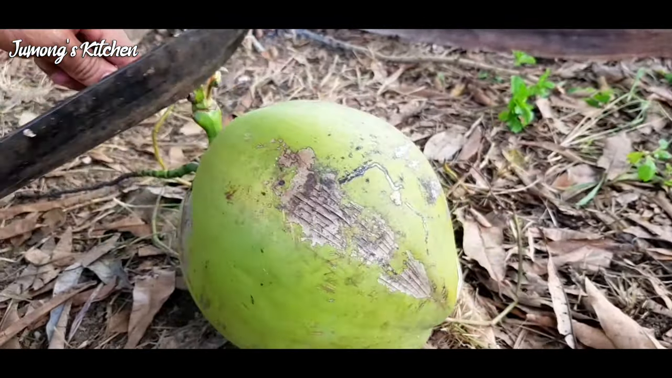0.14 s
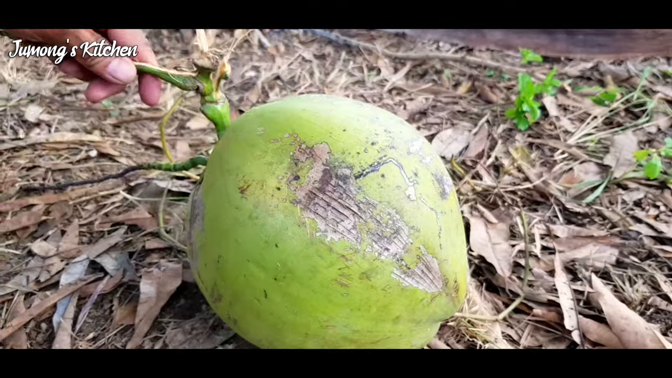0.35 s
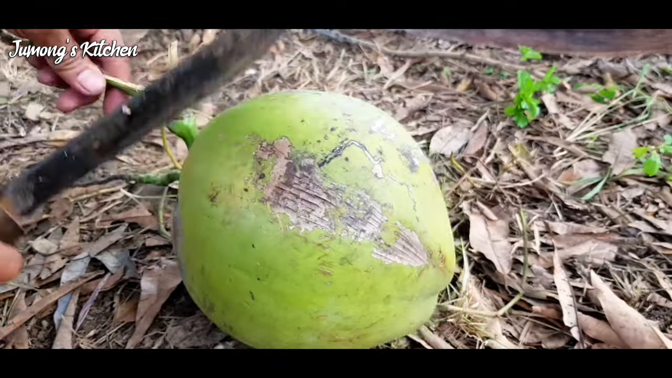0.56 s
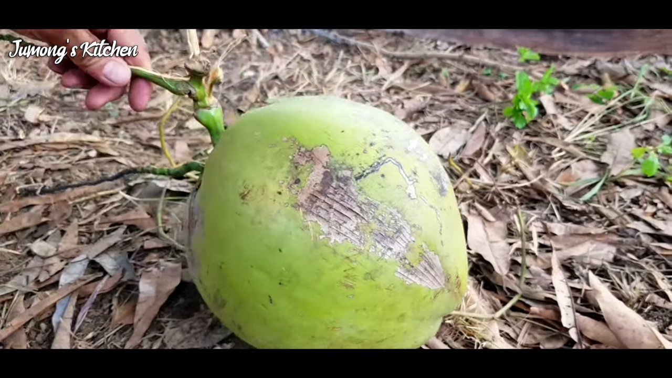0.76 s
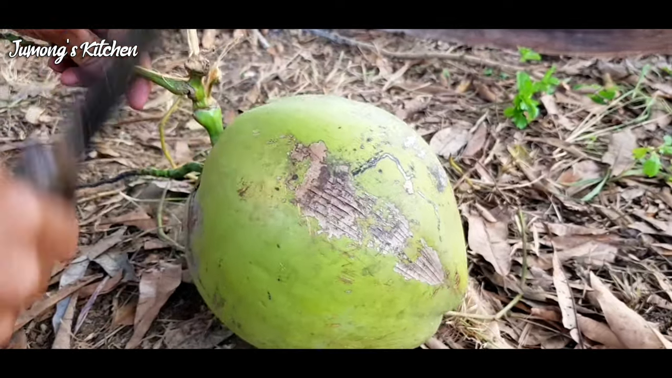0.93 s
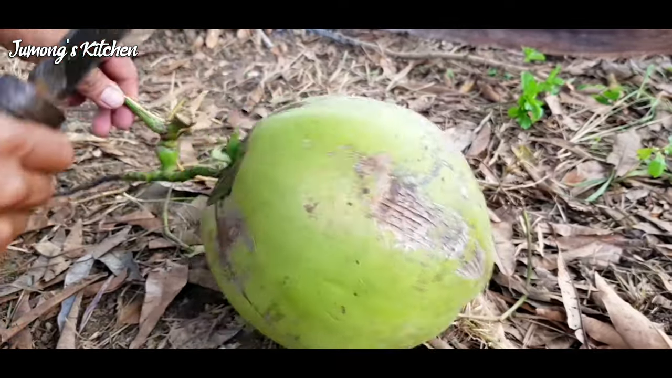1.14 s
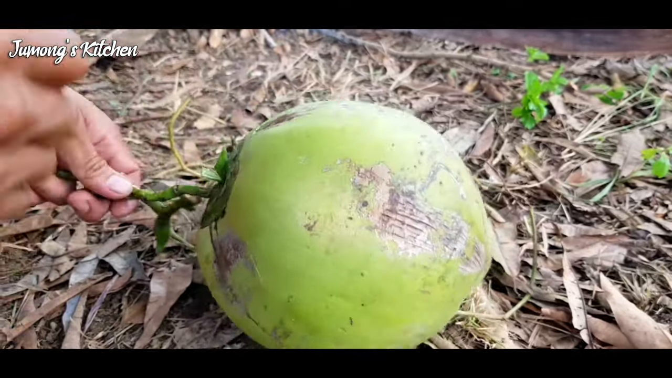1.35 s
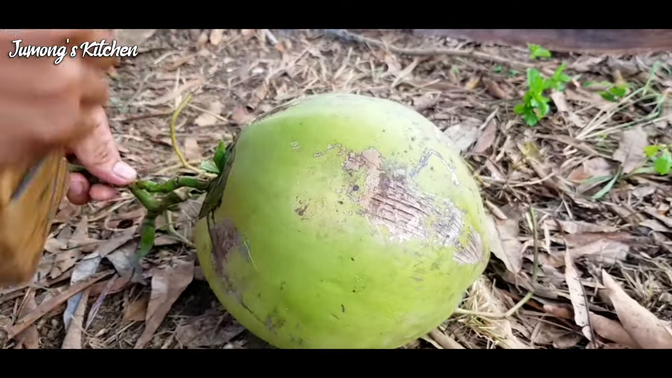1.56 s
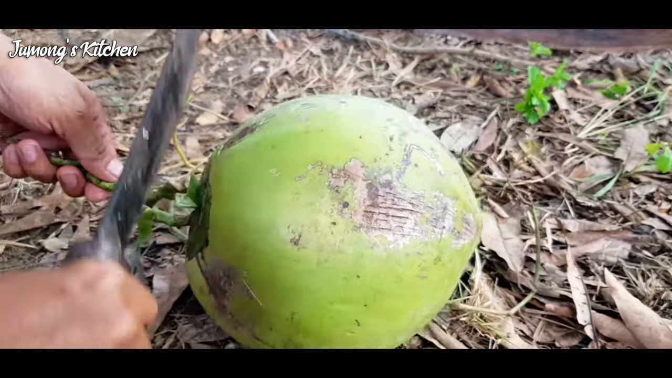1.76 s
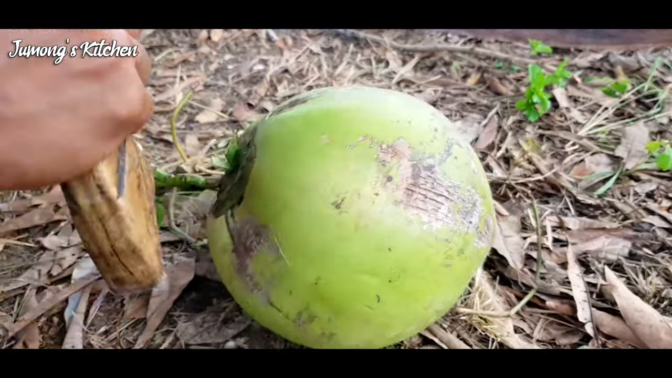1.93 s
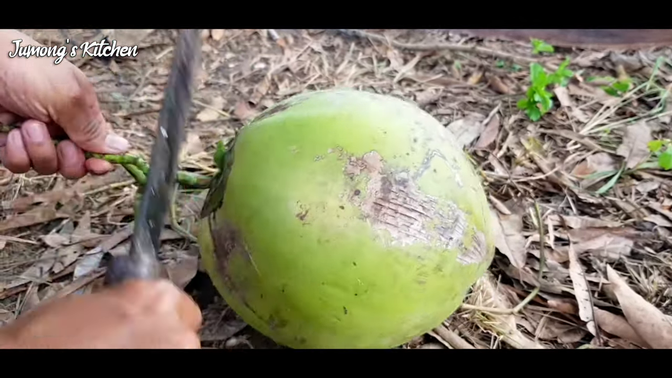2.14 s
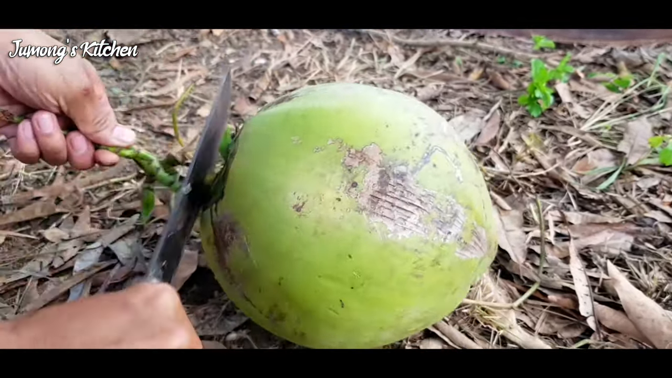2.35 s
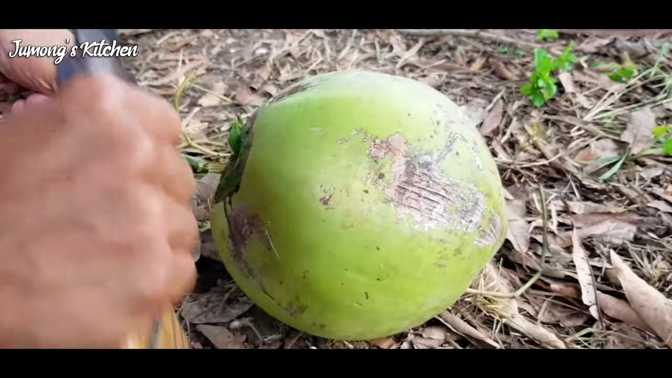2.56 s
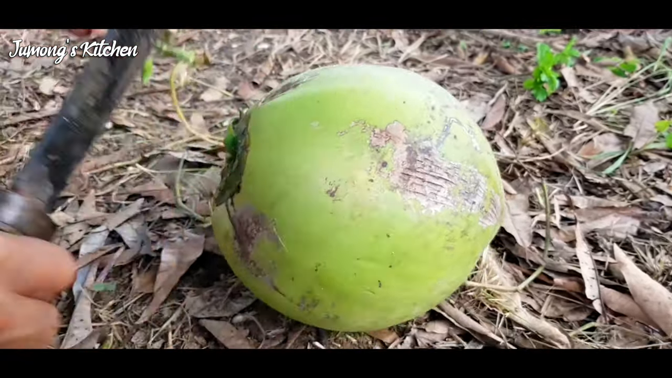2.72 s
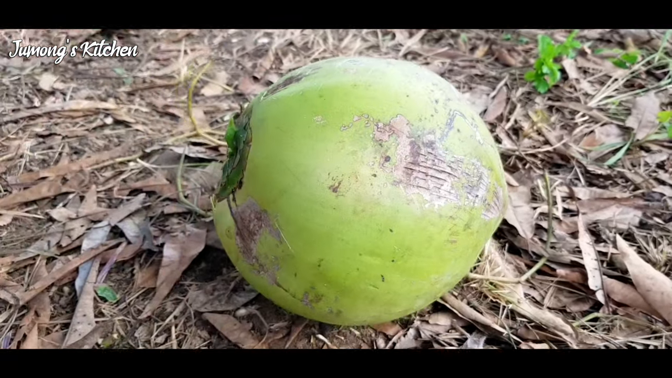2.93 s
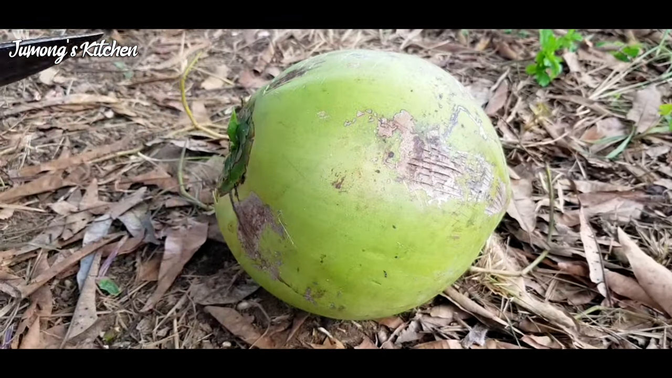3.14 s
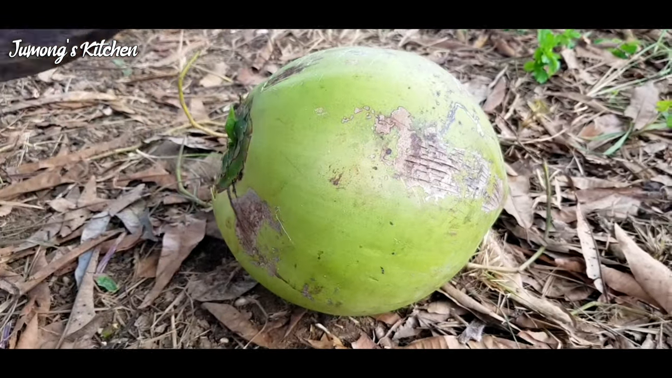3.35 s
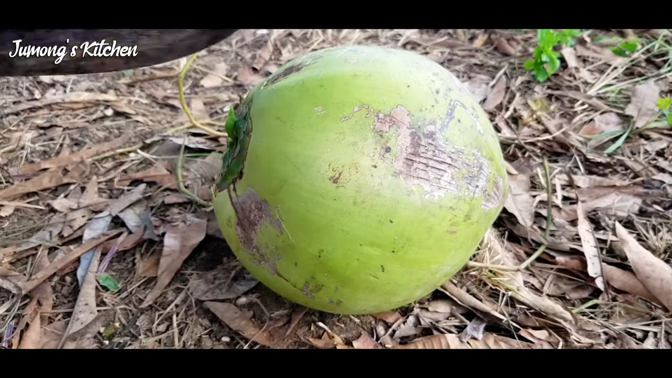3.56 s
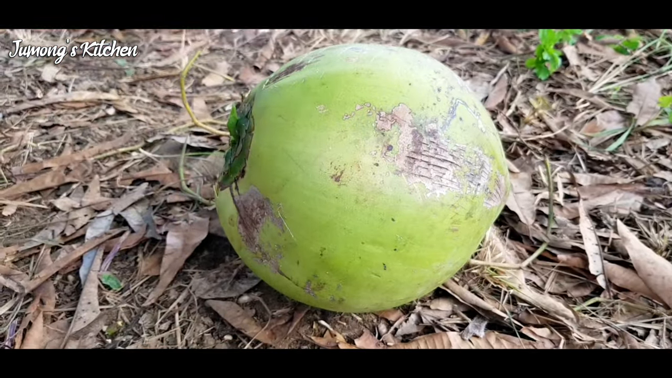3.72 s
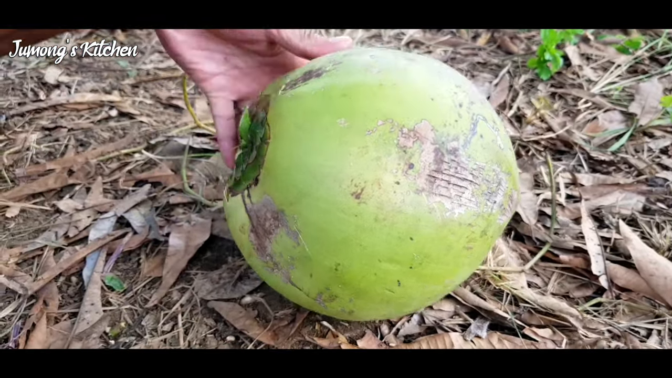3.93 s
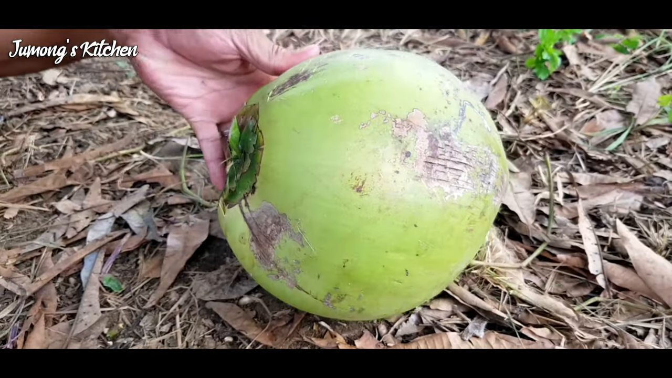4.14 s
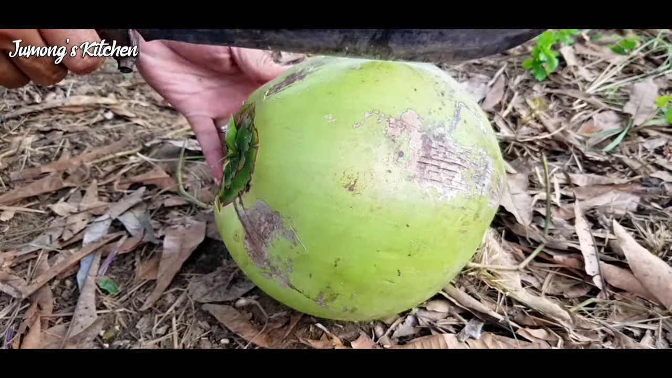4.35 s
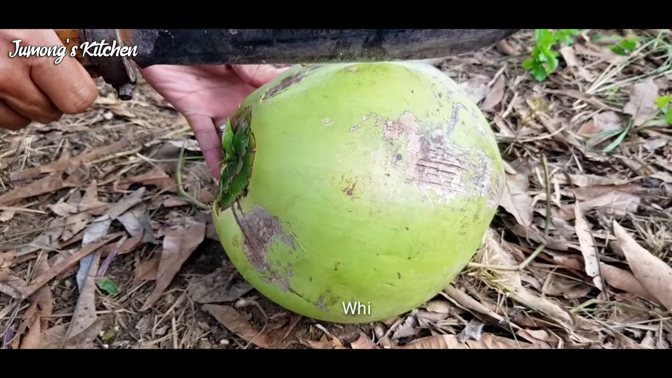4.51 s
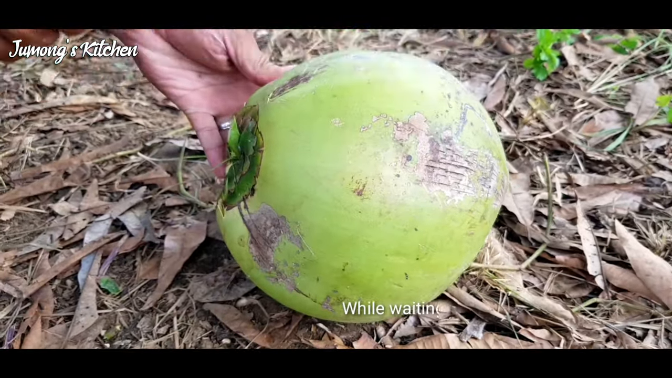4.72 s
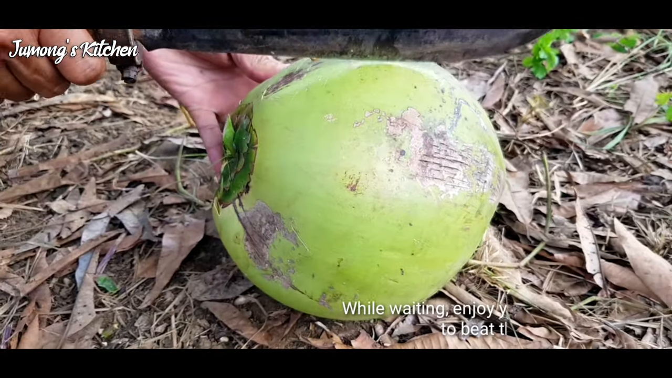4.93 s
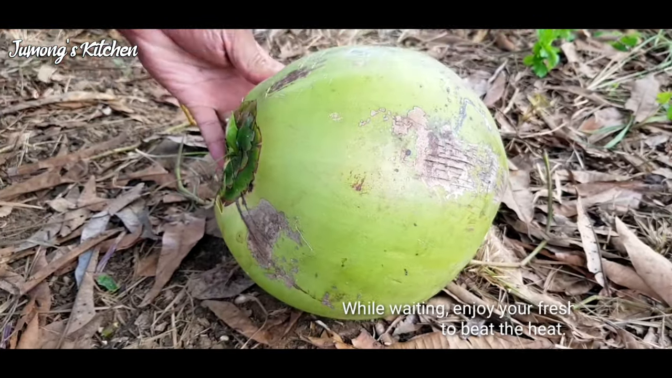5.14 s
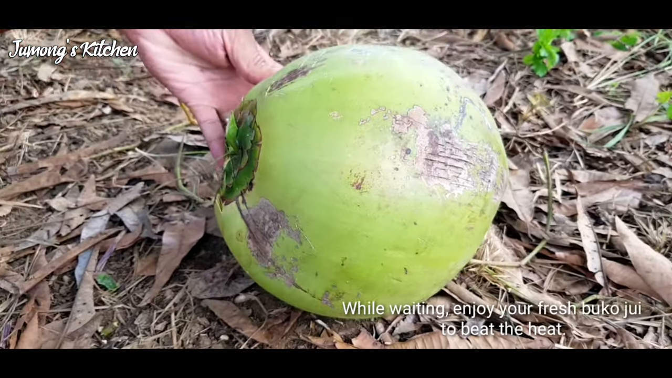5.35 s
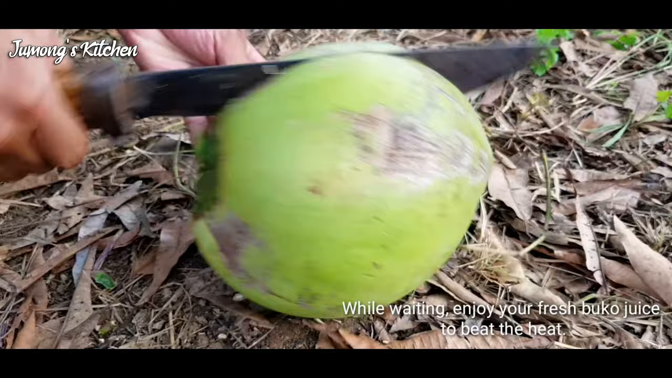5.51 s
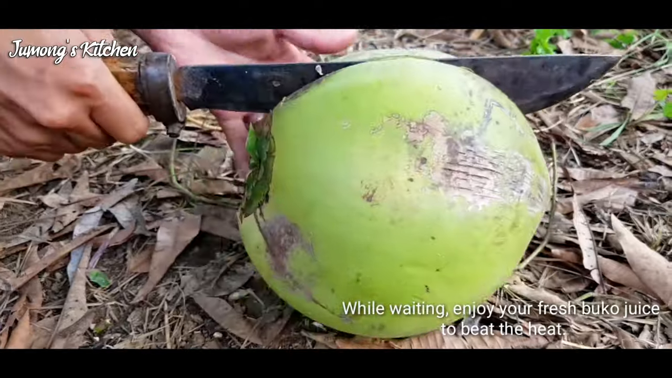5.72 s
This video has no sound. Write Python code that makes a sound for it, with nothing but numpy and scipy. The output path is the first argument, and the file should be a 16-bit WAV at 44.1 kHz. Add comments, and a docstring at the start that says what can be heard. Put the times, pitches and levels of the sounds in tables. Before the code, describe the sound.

Close outdoor stereo: a big blade hacks a green coconut lying on dry litter. A loud hollow crack comes early, then five more blows, some weaker and duller. A calmer stretch follows with leaves rustling, stalks snapping and a light knock with a clink, before one last heavy chop. Wind thumps low, mostly on the right, over soft hiss.

```python
"""Chopping a green coconut

A heavy knife hacks at a green coconut on dry leaves outdoors, close to the two ports of a phone.
Each blow bursts grainy noise for the crushed wet fibre and rings damped sines for the nut.
Leaves and stalks crackle as clicks of unequal size, the blade clinks, and a few thin tones squeak.
Wind buffets as low noise, mostly on the right, over a soft outdoor hiss and a far animal's gliding whine."""
import sys
import numpy as np
from scipy import signal
from scipy.fft import rfft, irfft
from scipy.io import wavfile
from scipy.ndimage import uniform_filter1d

SR = 44100
rng = np.random.default_rng(int(sys.argv[2]) if len(sys.argv) > 2 else 0)


def master(y):
    """Save y as 16-bit WAV."""
    cut = np.clip(np.atleast_2d(y).T, -1, 1)
    pcm = np.round(cut * 32767)  # scale
    wavfile.write(sys.argv[1], SR, pcm.astype(np.int16))


N = 259308
TIME = np.arange(N) / SR
SHOT = TIME[:SR // 2]  # the half second that one short sound may last


def undb(db):
    """Turn decibels into gain."""
    return 10 ** (np.asarray(db) / 20)


def unit(x):
    """Scale to rms 1."""
    return x / np.sqrt(np.mean(x ** 2))


def add(out, s, x):
    """Mix x into out from time s on."""
    start = max(int(s * SR), 0)
    n = min(x.shape[-1], out.shape[-1] - start)
    out[:, start:start + n] += x[..., :n]


def colour(x, points):
    """Filter noise through a curve of (Hz, dB) points, smooth over log frequency; rms 1."""
    hz, db = np.transpose(points)
    f = np.fft.rfftfreq(x.shape[-1], 1 / SR)
    gain = undb(np.interp(np.log(f + 1), np.log(hz), db))
    return unit(irfft(rfft(x) * gain, x.shape[-1]))


def walk(rate):
    """Draw random levels, hold each for 1 / rate seconds and slew them twice; rms 1."""
    hold = int(SR / rate)
    steps = np.repeat(rng.standard_normal(N // hold + 1), hold)
    return unit(uniform_filter1d(uniform_filter1d(steps, hold), hold)[:N])


def grains(n, spread_db):
    """Dense clicks of very unequal size, on three unrelated tracks."""
    size = undb(spread_db * np.minimum(rng.exponential(size=(3, n)), 2 * np.pi))
    return rng.standard_normal((3, n)) * size


def spread(tracks, shared):
    """Left and right from three tracks: one common, one for each side."""
    shared = np.clip(shared, 0, 1)
    return np.sqrt(shared) * tracks[0] + np.sqrt(1 - shared) * tracks[1:]


def ports(x, lag_ms, pan_db):
    """Sound reaches the left port first; positive pan_db favours the left."""
    left, right = np.broadcast_to(x, (2, x.shape[-1]))
    t = TIME[:len(left)]
    late_right = np.interp(t - lag_ms / 1000, t, right, left=0)
    return np.array([left * undb(pan_db / 2), late_right * undb(-pan_db / 2)])


def fade(t60):
    """Exponential decay by 60 dB in t60 seconds."""
    return np.exp(-np.log(1000) * SHOT / t60)


def mode(hz, t60, phase=0):
    """One damped resonance: a sine that dies away exponentially."""
    return np.sin(2 * np.pi * hz * SHOT + phase) * fade(t60)


# dry leaves pressed or dragged, one row a movement:
# [t/s, length/s, body level before crackle/dB, crisp level before crackle/dB]
RUSTLES = [(0.0, .11, -52, -57), (0.634, 0.048, -55, -68), (1.193, 0.023, -50, -60),
           (1.377, 0.087, -57, -52.5), (1.847, 0.17, -63.5, -58), (2.122, 0.086, -47, -43.5),
           (3.217, 0.058, -57.5, -51), (3.404, 0.042, -42, -37), (3.439, 0.13, -47.5, -47),
           (3.705, 0.17, -53, -44.5), (3.935, 0.2, -49.5, -47), (4.175, 0.11, -38, -31.5),
           (4.268, 0.19, -47, -47), (4.968, 0.11, -51.5, -63), (5.575, 0.064, -35.5, -54),
           (5.664, 0.14, -59, -59)]
# tone of the nut grinding on the litter: [f/Hz, relative level/dB]
GRIND = [(100, -11.5), (350, -2.5), (600, -2.5), (850, 6), (1300, 2), (1700, 5), (2100, -4), (2600, -7),
         (5000, -20)]
# tone of the brittle leaves: [f/Hz, relative level/dB]
LEAF = [(700, -26), (2000, -24), (3000, 6), (4500, 0.5), (5500, 1.5), (7500, 4), (9500, 1.5), (12000, 7),
        (14300, 3.5), (16000, -16)]
# dry stalks snapping: [t/s, level before fade/dB]
SNAPS = [(0.06, -38.5), (0.582, -32.5), (1.353, -44.5), (1.980, -42), (2.228, -35), (2.305, -41.5),
         (3.091, -43), (3.411, -36.5), (3.518, -34.5), (3.791, -26.5), (3.845, -36.5), (3.953, -39.5),
         (4.056, -34.5), (4.403, -21.5), (4.424, -35), (5.263, -37)]
# tone of a snapping stalk: [f/Hz, relative level/dB]
STALK = [(470, -40.5), (800, -15), (3930, -9.5), (4340, -14), (5710, -3.5), (7140, -10), (12800, -2.5),
         (15600, -21.5)]


def leaves():
    """The nut grinds over the litter; brittle leaves crackle in uneven spurts and stalks snap."""
    body, crisp = np.zeros((2, N))
    for s, length, body_db, crisp_db in RUSTLES:
        press = np.exp(-np.abs(2 * (TIME - s) / length - 1) ** 3)
        body += undb(body_db) * press
        crisp += undb(crisp_db) * press
    rustle = body * colour(spread(grains(N, spread_db=4.5), shared=0.8), GRIND)
    rustle += crisp * colour(spread(grains(N, spread_db=2.2), shared=0.11), LEAF)
    # single leaves give way at random, about 170 a second, each with a short spurt
    breaks = (rng.random(N) < 170 / SR) * np.minimum(rng.exponential(size=N), 2)
    rustle *= 0.7 + 1.4 * signal.fftconvolve(breaks, fade(0.008))[:N]
    snaps = np.zeros((2, N))
    for s, db in SNAPS:
        stalk = colour(spread(grains(len(SHOT), spread_db=4), shared=1.0), STALK)
        add(snaps, s, undb(db) * fade(0.02) * stalk)
    return ports(rustle, lag_ms=0.42, pan_db=-0.5) + ports(snaps, lag_ms=0.5, pan_db=1.5)


# breeze at the exposed right port, with a lull in the middle: [t/s, level before turbulence/dB]
BREEZE = [(0, -40.5), (.15, -48.5), (1.2, -46.5), (2.0, -39), (2.64, -41), (2.76, -52), (3.9, -57.5),
          (4.57, -45), (4.67, -37), (5.1, -36.5), (5.36, -53), (5.8, -43.5), (5.88, -90)]
# gusts that reach round to both ports: [t/s, right level/dB, left minus right/dB]
GUSTS = [(0.41, -35, -1), (1.418, -25.5, -7), (1.551, -33.5, 2), (1.64, -34, 2), (1.989, -27, -2),
         (2.30, -38, -5), (2.451, -36.5, -6.5), (2.611, -31, -5), (4.352, -40, 2.5), (4.91, -29, -9.5),
         (5.22, -34, -1), (5.79, -38.5, 0.5)]
# tone of the buffeting: [f/Hz, relative level/dB]
BUFFET = [(20, -6), (45, -4.5), (70, 3), (110, -2.5), (180, -13), (300, -22.5), (500, -37.5), (1000, -50.5),
          (3000, -87.5)]
SHELTER_DB, TURBULENCE_DB = -27, 5.5  # the left port lies in the lee; rms spread of the eddies
GUST_S = 0.018  # time a gust takes to swell, and to die


def wind():
    """Eddies thump as low noise on the exposed right port; mainly the gusts reach the left one too."""
    right = undb(np.interp(TIME, *np.transpose(BREEZE)) + TURBULENCE_DB * walk(22))
    left = undb(SHELTER_DB) * right
    for s, db, pan_db in GUSTS:
        gust = undb(db) * np.exp(-((TIME - s) / GUST_S) ** 2)
        left = np.hypot(left, undb(pan_db) * gust)
        right = np.hypot(right, gust)
    rumble = colour(spread(rng.standard_normal((3, N)), shared=0.12), BUFFET)
    return np.array([left, right]) * rumble


# level of the steady hiss, which rises and dips: [t/s, level before flicker and pan/dB]
HISS = [(0, -54), (.4, -60.5), (.6, -57), (1.0, -63.5), (1.17, -55.5), (1.72, -62), (2.05, -59.5),
        (3.7, -55.5), (5.78, -57.5), (5.83, -67.5)]
# tone of the hiss: [f/Hz, relative level/dB]
AIR = [(100, 6.5), (400, 12), (600, 2), (1200, -1), (1800, 0), (2700, -0.5), (4000, 0.5), (6000, 3.5),
       (8000, -0.5), (8900, 3), (10000, -1.5), (14000, -3), (16000, -18)]


def outdoors():
    """A smooth, wide noise hiss of distant foliage, flickering slightly in level."""
    hiss = colour(spread(rng.standard_normal((3, N)), shared=0.4), AIR)
    level_db = np.interp(TIME, *np.transpose(HISS)) + 0.5 * walk(14)
    return ports(hiss * undb(level_db), lag_ms=0.091, pan_db=0.97)


# light touches on the blade: [t/s, level before pan/dB, treble from the third mode up/dB, ring factor]
CLINKS = [(0.013, -47.5, -16, .25), (0.057, -46, -12, 0.15), (3.597, -53, -24, 0.37),
          (4.216, -43, -14, 1.1), (4.327, -46, -14, 1.08), (4.401, -52, 17, 0.56)]
# modes of the steel: [f/Hz, relative level/dB, t60 before ring factor/s]
BLADE = [(1670, 0, .55), (1755, -8, .25), (3500, -11, .15), (5600, -3, .12), (6400, 0, .16),
         (7900, -8, .12), (11970, -6, .1)]


def blade():
    """The steel rings in damped modes; a firm grip damps it sooner."""
    out = np.zeros((2, N))
    for s, db, treble_db, ring in CLINKS:
        steel = 0
        for k, (hz, mode_db, t60) in enumerate(BLADE):
            steel = steel + undb(mode_db + treble_db * (k > 1)) * mode(hz, t60 * ring)
        add(out, s, ports(undb(db) * steel, lag_ms=0.055, pan_db=2.0))
    return out


# tone of crushed fibre, before each blow's tilt and brightest band: [f/Hz, relative level/dB]
CRACK = [(200, -3.5), (700, 4), (2000, 1), (2750, -8.5), (3400, -3), (4300, -9), (5400, 3), (6200, -5.5),
         (7300, 2), (9800, -12), (11600, -0.5), (14000, 0.5), (16000, -34)]
ENTRY_S = 0.012  # lead of the faint onset before the main burst


def crack(bite, ring, crack_hz, tilt_db):
    """A faint grainy noise swells just before the burst; fibres then tear more weakly as the blade wedges."""
    t = np.maximum(SHOT - ENTRY_S, 0)
    onset = undb(-16.5) * np.exp(-np.abs(SHOT - ENTRY_S - bite) / (1.3 * bite))
    burst = (t / bite) ** 2 * np.exp(2 * (1 - t / bite))
    tear = undb(-17) * (1 - np.exp(-(t / bite) ** 2)) * np.exp(-t / (0.019 * ring))
    # every cut has its own slope and brightest band
    hz = np.geomspace(200, 18000, 80)
    band_db = 7 * np.exp(-(np.log(hz / crack_hz) / 0.18) ** 2)
    db = np.interp(hz, *np.transpose(CRACK)) + tilt_db * np.log2(hz) + band_db
    fibres = colour(spread(grains(len(SHOT), spread_db=1.5), shared=0.76), np.column_stack([hz, db]))
    return fibres * (onset + burst + tear)


# what the struck nut rings with:
# [f before detune/Hz, level before tilt/dB, t60 before cap and ring factor/s]
HUSK = [(355, -11, 0.055), (572, -10, 0.014), (623, -4.5, 0.12), (730, -9, .035), (804.2, 1, .04),
        (1004, -3, 0.056), (1141.7, -2.5, 0.083), (1485.4, -2.5, .04), (1720, 5.5, 0.034),
        (1960, -6.5, 0.01), (2317, -5, 0.058), (2555, -17, 0.013), (2825, -10, 0.1)]
# the soil under the nut: [f/Hz, relative level/dB, t60/s]
GROUND = [(141, 0.5, 0.0061), (186, -2.5, 0.063), (324, -2.5, 0.044)]
# tone of wet pulp squashed by the blade: [f/Hz, relative level/dB]
PULP = [(120, -18.5), (340, -16), (500, 0.5), (650, -3), (1100, -3.5), (1700, -9.5), (2600, -13.5),
        (5000, -32)]
# tone of the blow scattered by the ground and trees: [f/Hz, relative level/dB]
TAIL = [(200, 1), (600, 9.5), (1100, -3.5), (2000, -1), (4000, -2.5), (7000, -5.5), (12000, 2.5),
        (15000, -11)]
HOLLOW_T60_S, KNOCK_T60_S = 0.06, 0.042  # before the ring factor
BITE_S = 0.0021  # rise time as the edge enters the skin
NUT_LAG_MS, NUT_PHASE_RAD = 0.025, 0.73  # delay of the right port; phase gap between the ports


def strike(hollow_hz, hollow_db, knock_hz, knock_db, husk_db, tilt_db,
           crack_db, crack_hz, crack_tilt_db, push_s, ring, tail_db, thud_db):
    """The edge sinks in: fibres crack while the push builds up, rings the nut and thuds on the soil."""
    cut = 1 - np.exp(-(SHOT / BITE_S) ** 2)
    push = 1 - np.exp(-(SHOT / push_s) ** 2)
    thud = sum(undb(db) * mode(hz, t60) for hz, db, t60 in GROUND)
    # the hollow and knock modes depend on where the blade lands
    lead = NUT_PHASE_RAD * np.array([[0.5], [-0.5]])
    hollow = undb(hollow_db) * mode(hollow_hz, HOLLOW_T60_S * ring, lead)
    knock = undb(knock_db) * mode(knock_hz, KNOCK_T60_S * ring, lead)
    body = push * (hollow + knock)
    # each husk mode radiates a little differently to the two ports
    for k, (hz, db, t60) in enumerate(HUSK):
        detune, *scatter = rng.standard_normal(3)
        phase = k * np.pi + lead + 0.48 * np.array(scatter)[:, None]
        gain = undb(husk_db + db + tilt_db * np.log2(hz / 1000))
        body += gain * cut * mode(hz * (1 + 0.022 * detune), min(t60, 0.048) * ring, phase)
    # soft pulp fills the gaps between the modes with a dull crunch
    pulp = colour(spread(rng.standard_normal((3, len(SHOT))), shared=0.6), PULP)
    body += undb(husk_db - 2) * pulp * push * fade(0.06 * ring)
    tail = colour(spread(grains(len(SHOT), spread_db=1.5), shared=0.4), TAIL)
    tail *= cut * (fade(0.19) + undb(-23) * fade(0.45))
    out = undb(crack_db) * crack(BITE_S, ring, crack_hz, crack_tilt_db)
    add(out, ENTRY_S, body + undb(tail_db) * tail + undb(thud_db) * cut * thud)
    return ports(out, NUT_LAG_MS, pan_db=-0.44)


# chops, levels before envelopes and pan:
# [t/s, hollow f/Hz, hollow level/dB, knock f/Hz, knock level/dB, husk level/dB, husk tilt/dB per octave,
# crack level/dB, crack f/Hz, crack tilt/dB per octave, push rise/s, ring factor, tail level/dB]
CHOPS = [(0.596, 600.3, 9.5, 1185, 6.5, -7.5, 4, -8.5, 2259, 0, 0.0035, .51, -37.5),
         (1.0360, 596, -8, 935, 1.5, -17.5, 3, -7.5, 2310, 1.5, 0.0085, 0.88, -33.5),
         (1.8049, 594, -8.5, 1680, -14.5, -21, -3.5, -17.5, 3670, 1, 0.0067, 0.74, -43.5),
         (2.1144, 651, -10.5, 760, -15.5, -22, -4.5, -37, 7000, 2, 0.0016, 0.87, -33.5),
         (2.4240, 571, -4, 944, -26, -15.5, -2, -13, 6940, -0.5, 0.0069, 0.74, -38.5),
         (2.6791, 554, -3, 1780, -3.5, -14, -2.5, -12.5, 6860, -0.5, 0.0084, 0.94, -36.5),
         (5.5799, 570, 3, 904, 6, -7.5, -2.5, -11, 2880, -3.5, 0.0043, 0.78, -41)]
# light knocks: [t/s, husk level/dB, knock f/Hz, husk tilt/dB per octave, ring factor]
TAPS = [(0.5830, -40.5, 1186, 6.5, 2.35), (1.8901, -49.5, 880, -13, 2.26), (3.517, -37, 863, -6, 0.63),
        (4.323, -18, 1580, 0.5, 0.52), (4.9652, -33, 1062, -2.5, 1.1), (5.0003, -27, 1493, -2, 0.7),
        (5.646, -39, 1180, -1, 0.64)]
CHOP_THUD_DB = -34  # the soil thuds alike under every chop
# a tap's parts against its husk level (dB), and the settings all taps share
TAP_HOLLOW_DB, TAP_KNOCK_DB, TAP_CRACK_DB, TAP_TAIL_DB, TAP_THUD_DB = -15, 5, -19.5, -28, -4
TAP_HOLLOW_HZ, TAP_CRACK_HZ, TAP_PUSH_S = 640, 2400, 0.0011


def blows():
    """Chops cut deep and each sounds its own way; taps ring the same nut with little crack."""
    out = np.zeros((2, N))
    for s, *settings in CHOPS:
        add(out, s - ENTRY_S, strike(*settings, CHOP_THUD_DB))
    for s, db, knock_hz, tilt_db, ring in TAPS:
        tap = strike(TAP_HOLLOW_HZ, db + TAP_HOLLOW_DB, knock_hz, db + TAP_KNOCK_DB, db, tilt_db,
                     db + TAP_CRACK_DB, TAP_CRACK_HZ, 0, TAP_PUSH_S, ring,
                     db + TAP_TAIL_DB, db + TAP_THUD_DB)
        add(out, s - ENTRY_S, tap)
    return out


def glides(table, shape, waver, flutter_db):
    """Thin sines that all bend along one shape, unsteady in pitch and level."""
    out = np.zeros((2, N))
    bend = 1 + waver * walk(220)
    flutter = undb(flutter_db * walk(57))
    for s, length, pitch_hz, db in table:
        u = np.linspace(0, 1, int(length * SR))
        curve = np.polyval(np.polyfit([0, 0.5, 1], shape, 2), u)
        hz = pitch_hz * curve * bend[int(s * SR):][:len(u)]
        tone = np.sin(2 * np.pi * np.cumsum(hz) / SR)
        add(out, s, undb(db) * np.sin(np.pi * u) * tone)
    return out * flutter


# far whines: [t/s, length/s, f before bend and waver/Hz, peak level before flutter/dB]
WHINES = [(1.552, 0.106, 1150, -70.5), (4.86, .11, 1220, -55.5), (5.075, .06, 1000, -57.5),
          (5.14, .13, 1130, -62)]
# pitch at start, middle and end [share of f]
WHINE_ARCH = (0.54, 0.94, 1)


def animal():
    """Whines from far away arch up in pitch, their level broken up by the distance."""
    return glides(WHINES, WHINE_ARCH, waver=0.05, flutter_db=3.5)


# squeaks along the smooth skin: [t/s, length/s, f before bend and waver/Hz, peak level before flutter/dB]
SQUEAKS = [(2.494, .02, 1680, -57), (2.518, .018, 1520, -57), (3.745, .044, 5400, -57)]
# pitch at start, middle and end [share of f]
SQUEAK_FALL = (0.94, 0.99, 0.67)


def squeaks():
    """A leaf edge or the blade squeaks along the skin, as a brief tone that ends falling in pitch."""
    return glides(SQUEAKS, SQUEAK_FALL, waver=0.033, flutter_db=4.5)


def scene():
    """Mix all sources at the two ports."""
    return leaves() + wind() + outdoors() + blade() + blows() + animal() + squeaks()


TOP_HZ = 14700  # upper edge of the passband


def record(dry):
    """Peaks beyond full scale clip; a steep low-pass cuts the top."""
    low_pass = signal.ellip(8, 0.1, 60, TOP_HZ, fs=SR, output="sos")
    return signal.sosfiltfilt(low_pass, np.clip(dry, -1, 1))


dry = scene()
out = record(dry)
master(out)
```